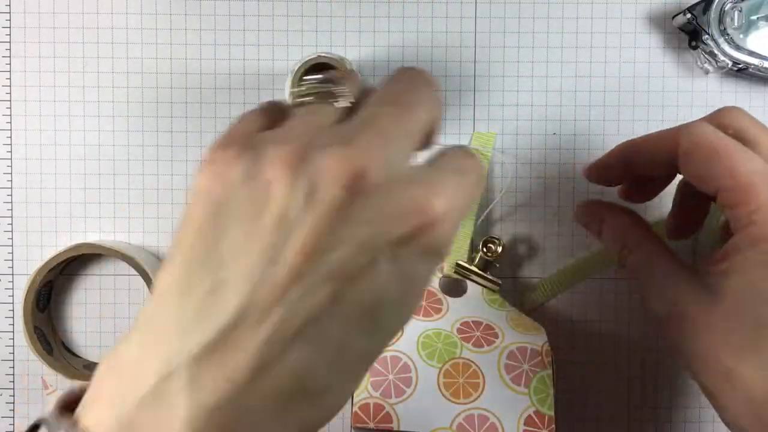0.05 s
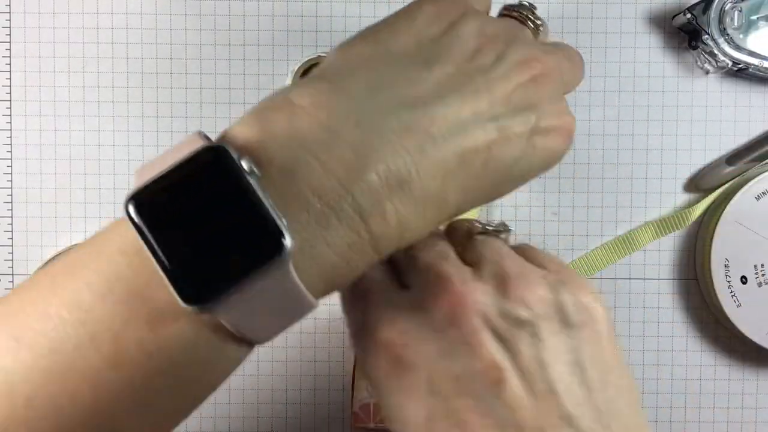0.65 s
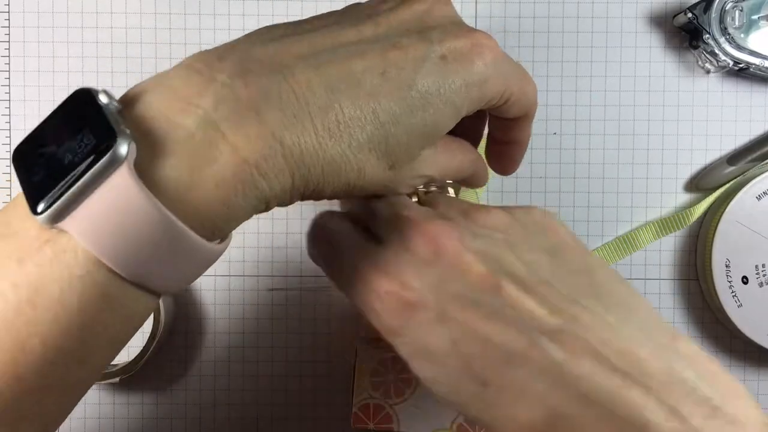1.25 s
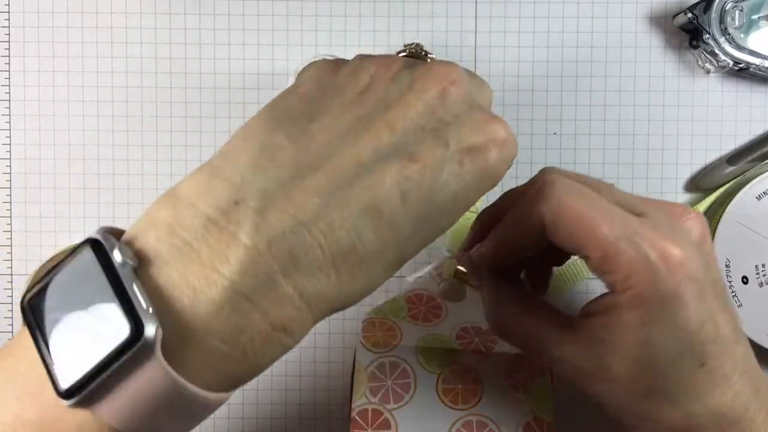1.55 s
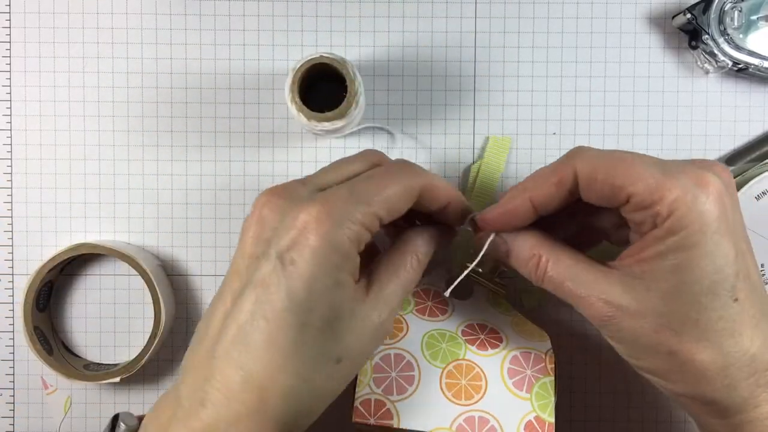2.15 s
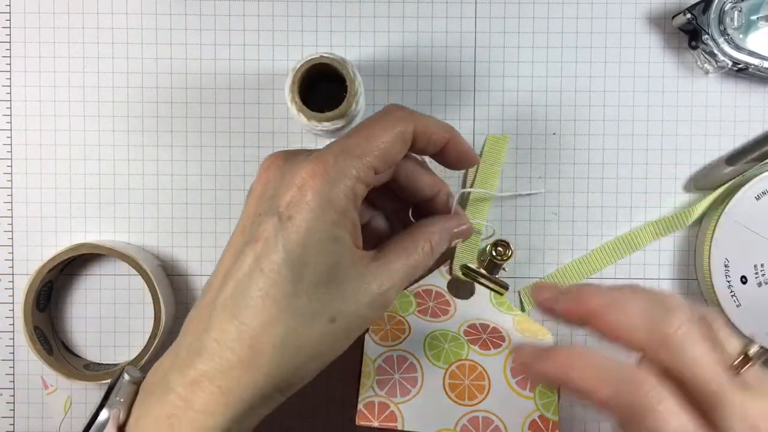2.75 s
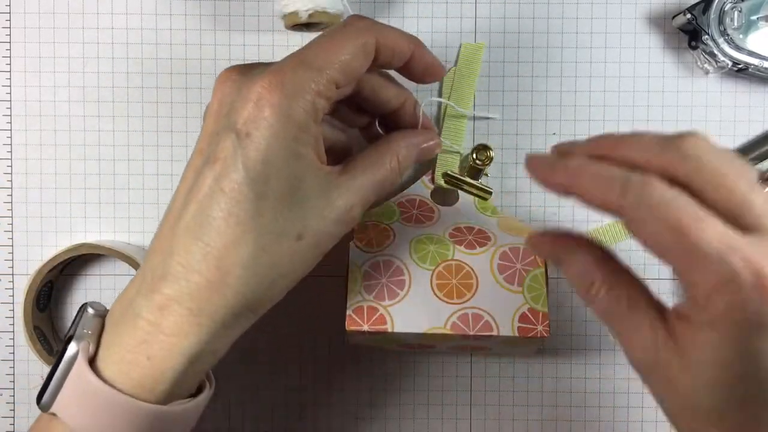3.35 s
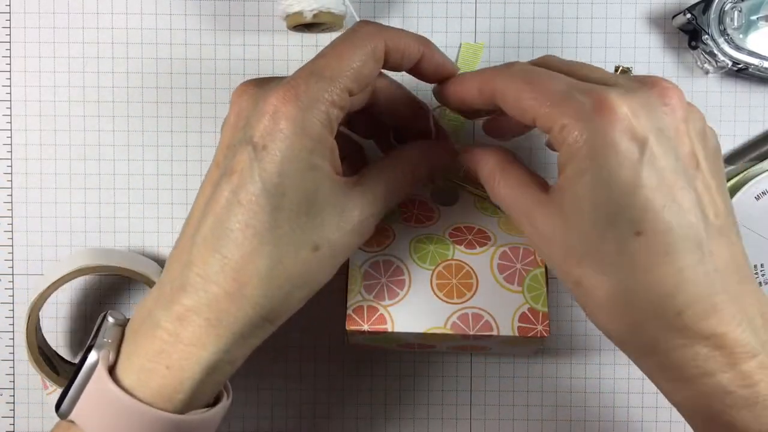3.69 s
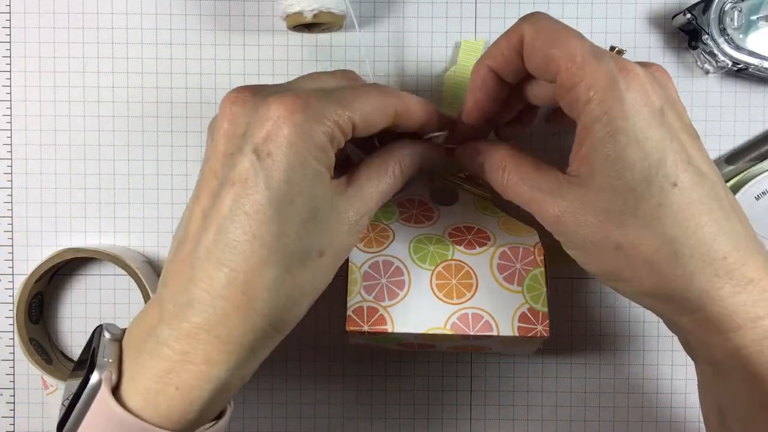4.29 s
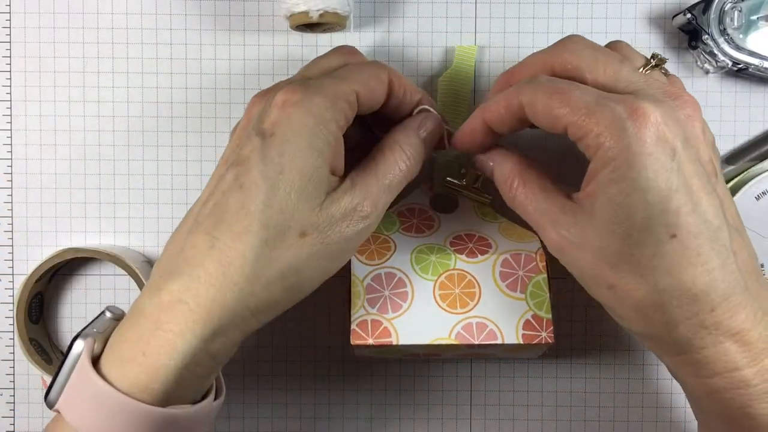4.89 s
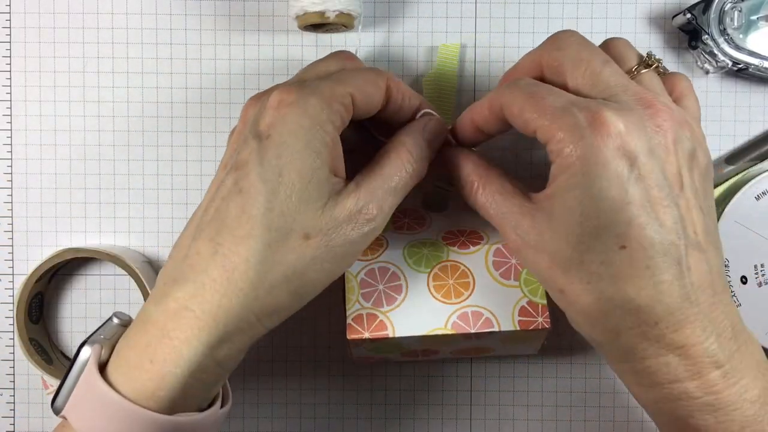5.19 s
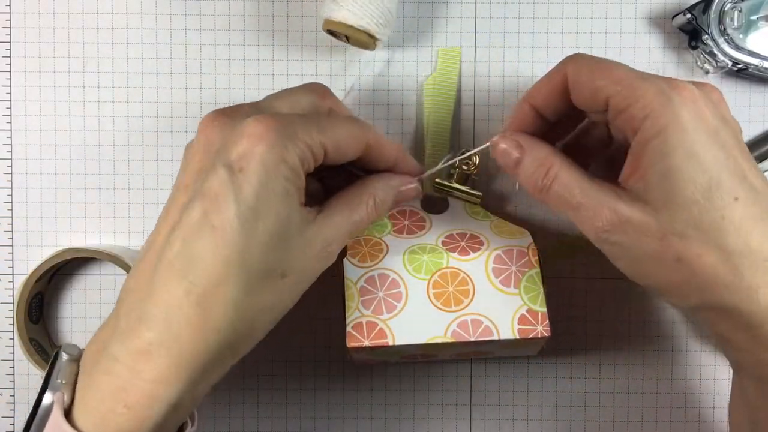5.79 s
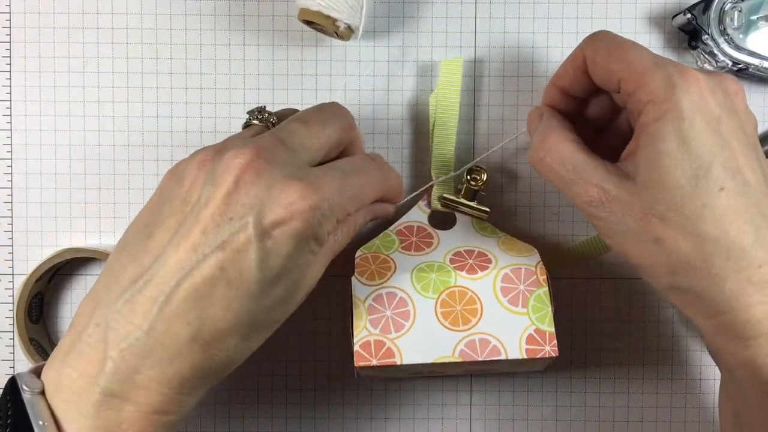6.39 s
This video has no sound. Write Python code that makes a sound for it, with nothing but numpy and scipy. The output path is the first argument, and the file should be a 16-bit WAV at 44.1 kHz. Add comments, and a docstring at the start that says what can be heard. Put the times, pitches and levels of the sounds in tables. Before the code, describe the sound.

Close, quiet handling sounds in a small room, over a faint hiss and hum. Dull bumps of hands on a table come first, then scattered taps and short papery rasps from a card basket held by a metal clip. The basket slides briefly and, a second later, knocks once sharply. After that, twine chafes softly under the fingers, with tiny ticks and a few light bumps.

```python
"""A small card basket, held shut by a metal clip, taps and scuffs on a craft table as hands tie it with twine.
Impacts excite the damped modes of the card and, when wrists land, those of the table top.
Stick-slip friction of fingers and twine makes the card rasp; fibres snap with tiny ticks.
A small room reverberates briefly over a faint hum and hiss, and the close microphone's
gain control ducks after the sharpest knock."""
import sys
import numpy as np
from scipy import signal
from scipy.fft import rfft, irfft, next_fast_len
from scipy.io import wavfile

SR = 44100
rng = np.random.default_rng(int(sys.argv[2]) if len(sys.argv) > 2 else 0)


def dump_mix(stems):
    """Bounce the given channels to the path in sys.argv[1] as a 16-bit WAV at rate SR."""
    frames = np.atleast_2d(stems).T  # one column per channel
    limited = np.clip(frames, -1, 1)  # hard clip at full scale
    pcm = np.round(limited * 32767).astype(np.int16)
    wavfile.write(sys.argv[1], SR, pcm)


N = 288414


def undb(db):
    """Amplitude grows tenfold with every 20 dB."""
    return 10 ** (np.asarray(db) / 20)


def clock(seconds):
    """Uniform sampling: the sample times of a span."""
    return np.arange(max(int(seconds * SR), 8)) / SR


def add(track, start, sound):
    """Superposition: a sound sums into the track from its start time."""
    i = max(int(start * SR), 0)
    track[i:i + len(sound)] += sound[:max(N - i, 0)]


def level(x, db):
    """Power normalisation: set the rms level."""
    return x * undb(db) / np.sqrt(np.mean(x ** 2))


def impact_level(x, db):
    """Energy normalisation: set a transient's level as its rms over 20 ms."""
    return x * undb(db) / np.sqrt(np.sum(x ** 2) / (.02 * SR))


def soften(x, corner_hz, order=2):
    """Low-pass filtering: a longer contact passes less treble."""
    return signal.sosfilt(signal.butter(order, min(corner_hz, SR / 2 - 2000), fs=SR, output="sos"), x)


def colour(x, points):
    """Spectral shaping by points of (frequency [Hz], gain [dB])."""
    size = next_fast_len(len(x))
    hz, db = np.transpose(points)
    gain = undb(np.interp(np.log(np.fft.rfftfreq(size, 1 / SR) + 1), np.log(hz), db))
    return irfft(rfft(x, size) * gain, size)[:len(x)]


def decay(t, t60):
    """Exponential damping: the level falls 60 dB in t60 seconds."""
    return np.exp(-np.log(1000) * t / t60)


def ring(modes, low_hz):
    """Modal superposition, in and out of phase; a small body radiates little below low_hz."""
    t, out = clock(1 / 2), 0
    scatter = rng.standard_normal((len(modes), 2))
    for k, ((hz, db, t60), (stray_db, detune)) in enumerate(zip(modes, scatter)):
        polarity = (-1) ** (k // 2)
        mode = np.sin(2 * np.pi * hz * (1 + .006 * detune) * t)
        out = out + polarity * undb(db + stray_db) * decay(t, t60) * mode
    return signal.sosfilt(signal.butter(2, low_hz, "high", fs=SR, output="sos"), out)


def panel(hz, t60, swell_s):
    """A damped sinusoid: one brief, pitched tock."""
    t = clock(1 / 8)
    return (1 - np.exp(-t / swell_s)) * decay(t, t60) * np.sin(2 * np.pi * hz * t)


def burst(t60, spectrum, rise_s=0.00081):
    """A broadband transient: noise swells as the contact closes, then decays."""
    t = clock(1)
    noise = rng.standard_normal(len(t)) * decay(t, t60) * (1 - np.exp(-t / rise_s))
    return colour(noise, spectrum)[:len(t) // 2]


def drift(rate_hz):
    """Random modulation: a continuous wander with a spread near 1."""
    knots = rng.standard_normal(4096)
    return np.interp(np.arange(N) / SR * rate_hz, np.arange(len(knots)), knots)


def friction(per_s, spread_db, uneven_db):
    """Stick-slip friction: dense catches of unequal size under wavering finger pressure."""
    catches = (rng.random(N) < per_s / SR) * rng.choice([-1, 1], N)
    sizes = undb(spread_db * np.minimum(rng.exponential(size=N), 4))
    return catches * sizes * undb(uneven_db * drift(70))


def stroke(texture, start, length, db, edge):
    """Windowing: a stretch of friction whose rise and fall take up the fraction `edge`."""
    i = int(start * SR)
    piece = texture[i:i + int(length * SR)]
    return level(piece * signal.windows.tukey(len(piece), min(edge, 1)), db)


def walls(x, t60=0.027, ring_db=-3):
    """Modal overlap: the card's close resonances, new for each stroke, give friction a papery rasp."""
    t = clock(1 / 8)
    response = rng.standard_normal(len(t)) * decay(t, t60)
    return x + undb(ring_db) * signal.fftconvolve(x, response / np.linalg.norm(response))[:len(x)]


# spectrum of room air and microphone hiss: (frequency [Hz], gain [dB])
AIR_SPECTRUM = [(15, -48), (30, -7.5), (60, 0), (125, -1), (190, -5.5), (280, -6.5), (480, -14.5),
                (1300, -18.5), (3000, -23.5), (6500, -26.5), (12000, -27), (16000, -25.5)]
# mains hum partials: (frequency [Hz], level [dB])
HUM_PARTIALS = [(120.5, -70.5), (241, -75.5)]
def background():
    """The noise floor: broadband air with a wavering rumble, and the harmonics of a mains hum."""
    air = level(colour(rng.standard_normal(N), AIR_SPECTRUM), db=-61)
    air = air + soften(air, 520) * (undb(2 * drift(3.6)) - 1)
    t, hum = np.arange(N) / SR, 0
    for hz, db in HUM_PARTIALS:
        partial = np.sin(2 * np.pi * hz * t + .5 * drift(4.5))
        hum = hum + level(partial * undb(2 * drift(4.26)), db)
    return air + hum


# reverberation bands: (frequency [Hz], echo gain [dB], decay time T60 [s])
ROOM_BANDS = [(60, 1, 0.21), (240, -3.5, 0.21), (627, -9, 0.13), (1410, -9.5, 0.25), (3040, -12, 0.36),
              (6920, -12.5, 0.17), (14000, -14, 0.13)]
def room(x, first_s=0.0074, build_s=0.0018):
    """Diffuse reverberation: echoes build up quickly, and each band decays at its own rate."""
    t, tail = clock(1 / 2), 0
    hz, db, t60 = np.transpose(ROOM_BANDS)
    freqs = np.fft.rfftfreq(len(t), 1 / SR)
    noise = rfft(rng.standard_normal(len(t)))
    for share, band_db, band_t60 in zip(np.eye(len(hz)), db, t60):
        envelope = decay(t, band_t60) * np.clip((t - first_s) / build_s, 0, 1)
        band = irfft(noise * np.interp(np.log(freqs + 1), np.log(hz), share), len(t))
        tail = tail + undb(band_db) * band * envelope / np.linalg.norm(envelope)
    return signal.fftconvolve(x, tail)[:N]


# twine fibres snapping free: (time [s], level [dB])
FIBRE_SNAPS = [(1.915, -60), (2.259, -63), (3.449, -63), (4.464, -59), (4.8703, -67), (5.126, -64),
               (5.289, -55), (5.296, -57), (5.554, -55), (5.608, -61), (5.623, -61), (5.659, -61),
               (6.169, -59), (6.245, -64.5)]
def fibre_ticks(peak_hz=12100, knotting_s=(4.9, 6.3), faint_per_s=4, faint_db=-69, spread_db=3):
    """Sudden release of tension: snaps too light to move the card, with fainter ones during knotting."""
    out = np.zeros(N)
    spectrum = [(peak_hz / 8, -28), (peak_hz / 2, -13), (peak_hz, 0), (peak_hz * 2, -6)]
    begin, end = knotting_s
    chance = rng.random((int(faint_per_s * (end - begin)), 2))
    faint = [(begin + when * (end - begin), faint_db + spread_db * (2 * size - 1))
             for when, size in chance]
    for start, db in FIBRE_SNAPS + faint:
        add(out, start, impact_level(burst(0.0076, spectrum), db))
    return out


# spectrum of skin and twine on card: (frequency [Hz], gain [dB])
CHAFE_SPECTRUM = [(300, -33), (620, -4), (800, -22.5), (1100, 4.5), (1450, -1), (1750, -5.5), (2200, -3.5),
                  (2900, -11.5), (3700, -6.5), (7500, -8), (11000, -21), (16000, -35)]
# spectrum of loose fibres: (frequency [Hz], gain [dB])
FIBRE_SPECTRUM = [(1000, -8), (3500, -8), (7500, -1), (9000, 2), (13000, 0), (16000, 2.5)]
# fingers and twine sliding on card: (time [s], duration [s], level [dB], grip corner frequency [Hz])
RUB_STROKES = [(0.305, 0.047, -67.5, 4000), (0.928, 0.051, -69.5, 2800), (1.007, 0.11, -57, 2940),
               (1.406, 0.074, -47, 3600), (1.755, 0.046, -65.5, 2470), (1.915, 0.14, -72.5, 700),
               (2.134, 0.056, -59, 2700), (2.202, 0.039, -46.5, 5500), (2.581, 0.062, -59, 4000),
               (2.643, 0.097, -62.5, 3600), (2.975, 0.038, -45.5, 6000), (3.618, 0.3, -70, 1190),
               (4.548, 0.15, -63, 1500), (4.689, 0.098, -59, 4500), (5.136, 0.11, -61, 1930),
               (5.183, 0.035, -50, 2400), (5.26, 0.037, -60, 3000), (5.875, 0.25, -63, 3430),
               (6.082, 0.1, -54.5, 3120), (6.322, 0.064, -57.5, 2200)]
# twine and paper slipping lightly: (time [s], duration [s], level [dB])
LIGHT_SLIPS = [(0.64, 0.13, -61.5), (1.33, .08, -69), (2.17, 0.035, -59.5), (2.931, 0.055, -45.5),
               (3.423, 0.051, -61)]
def rubbing(light_rub_db=-62, flattening=0.53, taut_from_s=4.95):
    """Stick-slip excitation: skin and twine drive the card walls; loose fibres hiss above them."""
    out = np.zeros(N)
    chafe = colour(friction(per_s=2200, spread_db=2.8, uneven_db=2.5), CHAFE_SPECTRUM)
    hiss = colour(friction(per_s=6000, spread_db=2.5, uneven_db=4.0), FIBRE_SPECTRUM)
    for start, length, db, corner_hz in RUB_STROKES:
        hiss_db = -5 + 6.5 * np.log2(corner_hz / 2980)  # a tighter grip hisses more
        hiss_db -= flattening * (db - light_rub_db)  # firmer rubs press the fibres flat
        rasp = walls(stroke(chafe, start, length, 0, edge=0.73))
        add(out, start, level(soften(rasp, corner_hz, order=1), db))
        add(out, start, stroke(hiss, start, length, db + hiss_db, edge=0.96))
    for start, length, db in LIGHT_SLIPS:
        add(out, start, stroke(hiss, start, length, db, edge=0.21))
    # the taut twine chafes faintly between strokes
    add(out, taut_from_s, stroke(chafe, taut_from_s, N / SR, db=-72, edge=0.03))
    return out


# spectrum of the basket's base on the paper mat: (frequency [Hz], gain [dB])
SCUFF_SPECTRUM = [(200, -22), (430, -13), (660, -11), (800, -12.5), (1000, -3), (1450, -1.5), (1700, -4.5),
                  (2000, -6), (2900, -9.5), (3600, -7.5), (4700, -7.5), (6000, -11), (10000, -15.5),
                  (16000, -18.5)]
# pushes across the mat: (time [s], duration [s], level at top speed [dB])
BASKET_PUSHES = [(2.922, 0.16, -44.5), (3.027, 0.29, -40.5)]
def basket_slide(speed_power=1.4, skew=0.68):
    """Sliding friction: the basket scuffs over the mat with an amplitude that is a power of its speed."""
    out = np.zeros(N)
    grain = colour(friction(per_s=4500, spread_db=3.1, uneven_db=1.6), SCUFF_SPECTRUM)
    for start, length, db in BASKET_PUSHES:
        scuff = walls(stroke(grain, start, length, 0, edge=0))
        progress = np.linspace(0, 1, len(scuff), endpoint=False)
        speed = np.sin(np.pi * progress ** skew)  # a skew under 1 reaches top speed early
        add(out, start, level(scuff, db) * speed ** speed_power)
    return out


# modes of the table top: (frequency [Hz], level [dB], decay time T60 [s])
TABLE_MODES = [(58, -14.5, 0.43), (85, -11.5, 0.15), (122.2, -4.5, 0.19), (142, -13, 0.12),
               (258.3, -2, 0.099), (294, -5.5, 0.11), (350, -13, 0.017), (540, -17, 0.046)]
# spectrum of the card's many small, overlapping resonances: (frequency [Hz], gain [dB])
FLUTTER_SPECTRUM = [(150, -12.5), (450, 5), (900, 3), (1400, 3.5), (2400, -10.5), (3300, -0.5), (4500, -16),
                    (6200, -15), (8000, -10), (16000, -38)]
# spectrum of a closing contact: (frequency [Hz], gain [dB])
CRACK_SPECTRUM = [(300, -15), (1000, -9), (2500, -9), (6000, -10.5), (9000, -19.5), (16000, -13.5)]
# hands landing on the table: (time [s], reference level [dB], thud frequency [Hz])
HAND_LANDINGS = [(0.2871, -32, 326), (1.026, -36, 320), (1.048, -33.5, 287), (1.0685, -46, 320),
                 (3.3602, -36.5, 210), (3.4334, -45, 245), (5.845, -54.5, 424), (6.178, -59, 260)]
# hands shifting their weight: (time [s], duration [s], level [dB])
HAND_SHIFTS = [(1.59, 0.2, -68.5), (3.502, 0.45, -68), (6.073, 0.41, -61.5)]
def hand_bumps():
    """Soft impact: a long contact drives the table's low modes; shifting hands rumble by friction."""
    out = np.zeros(N)
    for start, db, thud_hz in HAND_LANDINGS:
        octaves = np.log2(thud_hz / 300)  # slower contacts ring and slap more
        thud = panel(thud_hz, t60=0.016, swell_s=0.0035)
        table = soften(ring(TABLE_MODES, low_hz=48), thud_hz, order=1)
        basket_shake = soften(burst(0.056, FLUTTER_SPECTRUM), 2 * thud_hz)
        skin_slap = burst(0.013, CRACK_SPECTRUM)
        add(out, start, impact_level(thud, db - 6))
        add(out, start, impact_level(table, db - 1 - 5 * octaves))
        add(out, start, impact_level(basket_shake, db - 13))
        add(out, start, impact_level(skin_slap, db - 20 - 7 * octaves))
    catches = friction(per_s=460, spread_db=2.5, uneven_db=3)
    rumble = colour(catches, [(30, -18), (65, 0.5), (300, -4), (500, -18), (1500, -44)])
    for start, length, db in HAND_SHIFTS:
        add(out, start, stroke(rumble, start, length, db, edge=0.4))
    return out


CARD_MODES = [(484, -16, 0.023), (540, -0.5, 0.044), (598, 5, 0.018), (838, 6, 0.038), (900, -9, 0.115),
              (1155, -6.5, 0.15), (1234, 3.5, 0.064), (1410, 0, 0.034), (1534, 7, 0.041), (1760, 3, 0.044),
              (1920, -14.5, 0.046), (2313, 0.5, 0.042), (2410, -5, 0.11), (3044, -7, 0.066),
              (3526, -1, 0.033), (4520, 2, 0.0255)]
# basket and clip knocking: (time [s], card level [dB], contact corner frequency [Hz],
# panel frequency [Hz], panel level re card [dB])
BASKET_KNOCKS = [(1.4145, -43, 5370, 1640, -2.5), (1.5578, -38.5, 2700, 1660, -1),
                 (1.5642, -44, 2950, 2140, -2.5), (2.249, -43.5, 2290, 1260, -2),
                 (2.607, -64.5, 2500, 1225, 7), (2.9329, -44.5, 5000, 1680, -6),
                 (2.9705, -47.5, 4000, 1095, 7.5), (4.085, -27, 3200, 1210, -3.5),
                 (4.124, -37, 1110, 1410, -31), (4.7846, -40, 1650, 1367, 4),
                 (4.8143, -48.5, 1510, 1400, -20), (6.335, -62, 2600, 1390, 1)]
def basket_taps(low_tock_hz=512, table_lag_s=0.0014):
    """Hard impact: a short contact cracks and excites card and table; a low, brief tock lies under each."""
    out = np.zeros(N)
    for start, db, corner_hz, panel_hz, panel_db in BASKET_KNOCKS:
        card = impact_level(ring(CARD_MODES, low_hz=343), -2.9)
        flutter = impact_level(burst(0.05, FLUTTER_SPECTRUM), -2)
        tock = panel(panel_hz, t60=0.014, swell_s=0.0017)  # the touched patch flexes
        crack = soften(burst(0.015, CRACK_SPECTRUM), 3 * corner_hz, order=1)
        crack_db = -6.5 + 4.5 * np.log2(corner_hz / 3050)  # harder contacts crack more
        low_tock = panel(low_tock_hz, t60=0.037, swell_s=0.0021)
        table = ring(TABLE_MODES, low_hz=130)
        add(out, start, impact_level(soften(card + flutter, corner_hz), db))
        add(out, start, impact_level(tock, db + panel_db))
        add(out, start, impact_level(crack, db + crack_db))
        add(out, start, impact_level(low_tock, db - 13.5))
        add(out, start + table_lag_s, impact_level(table, db - 7))
    return out


def scene(echo_s=0.002996, echo_db=-7):
    """Superposition of direct sound, a nearby surface's reflection, reverberation and noise floor."""
    direct = hand_bumps() + basket_taps() + fibre_ticks() + rubbing() + basket_slide()
    near = direct.copy()
    add(near, echo_s, undb(echo_db) * soften(direct, 2300, order=1))
    return (near + room(direct) + background())[None]


def gain_control(x, threshold_db=-21, slope=0.6, release_s=0.33, attack_s=0.028):
    """Dynamic compression: peaks over the threshold pull the gain down; it creeps back afterwards."""
    t = np.arange(N) / SR
    over_db = np.maximum(20 * np.log10(np.abs(x) + 1e-9) - threshold_db, 0)
    held_db = np.maximum.accumulate(over_db * np.exp(t / release_s)) * np.exp(-t / release_s)
    pole = np.exp(-1 / (attack_s * SR))
    return x * undb(-slope * signal.lfilter([1 - pole], [1, -pole], held_db))


# frequency response of the microphone: (frequency [Hz], gain [dB])
MICROPHONE_RESPONSE = [(9600, -1), (10300, -5), (11500, -2.5), (14000, -7.5)]
def record(dry):
    """Transduction: the microphone's response, then compression and band limiting."""
    sound = gain_control(colour(dry[0], MICROPHONE_RESPONSE))
    top_cut = signal.ellip(10, .1, 70, 16200, fs=SR, output="sos")
    return signal.sosfilt(top_cut, sound)[None]


dry = scene()
out = record(dry)
dump_mix(out)
```